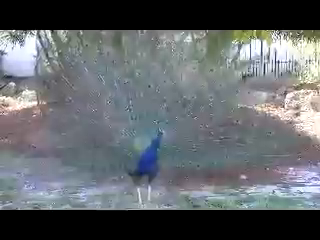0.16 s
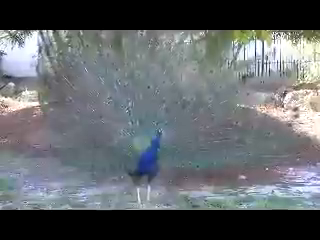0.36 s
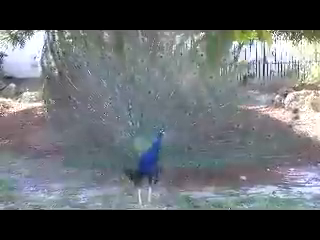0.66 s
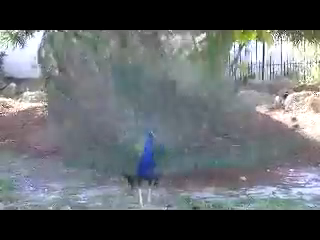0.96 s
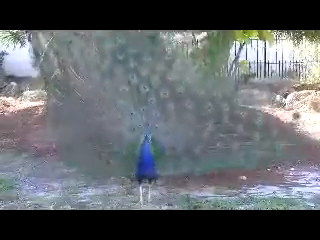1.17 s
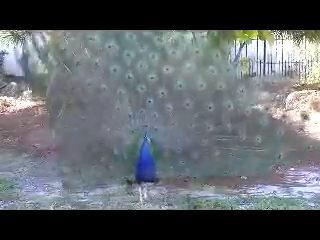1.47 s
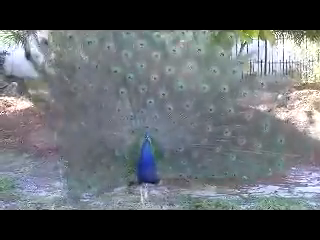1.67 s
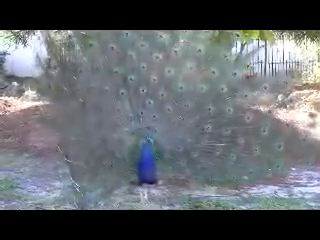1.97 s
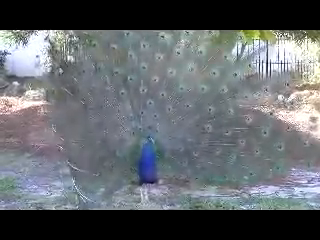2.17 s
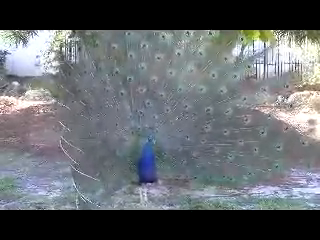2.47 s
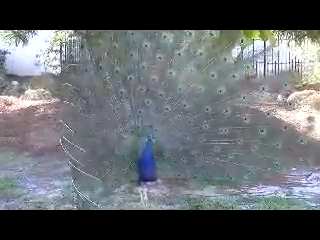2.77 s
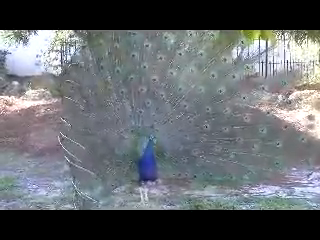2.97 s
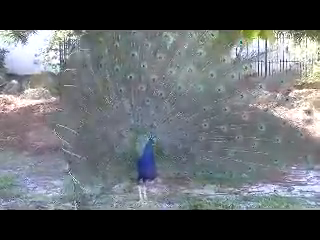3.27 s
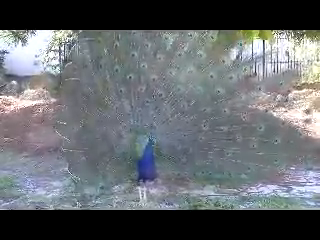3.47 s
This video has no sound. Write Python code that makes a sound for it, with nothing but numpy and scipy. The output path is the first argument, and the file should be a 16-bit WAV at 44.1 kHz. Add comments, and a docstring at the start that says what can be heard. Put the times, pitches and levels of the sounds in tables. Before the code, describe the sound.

Stiff feathers brush and click in a brief, dry, papery flurry, centred, then settle. Outdoors, soft traffic wash, faint machine hum and a thin whine continue throughout; dull treble limit, slightly wide background.

```python
"""A peacock rattling its train

A fanned train swings round: barbs rustle, bunches of feathers brush past each other, stiff quills click.
Rustle and brushes are sprays of tiny filtered grains; each click is a snap, a noisy chatter and a short ring.
Behind lie a wash of distant traffic in filtered noise, a faint machine hum and a thin high whine in sines.
Nearly everything sits in the middle; only the background wash has stereo width, which narrows for a while."""
import sys
import numpy as np
from scipy.fft import rfft, irfft, next_fast_len
from scipy.io import wavfile
from scipy.ndimage import map_coordinates

SR = 44100
rng = np.random.default_rng(int(sys.argv[2]) if len(sys.argv) > 2 else 0)


def transcribe(u):
    """Save the signal u as a 16-bit wav file named by the first command-line argument.

    u: samples, shape (n,) or (channels, n), limited to [-1, 1]; the rate is SR.
    q: integer samples, one column per channel.
    """
    v = np.clip(np.atleast_2d(u).T, -1, 1)
    q = np.round(v * 32767).astype(np.int16)
    wavfile.write(sys.argv[1], SR, q)


N = 159642  # length in samples
TIME_S = np.arange(N) / SR


def amp(db):
    """Decibels to gain."""
    return 10 ** (np.asarray(db) / 20)


def unit(x):
    """Scaled to rms 1."""
    return x / np.sqrt(np.mean(x ** 2) + 1e-20)


def along_frequency(points, hz):
    """(Hz, value) points read on a log frequency axis."""
    point_hz, values = np.transpose(points)
    return np.interp(np.log(hz + 1), np.log(point_hz + 1), values)


def along_time(points):
    """(seconds, value) points joined by straight lines."""
    return np.interp(TIME_S, *np.transpose(points))


def wobble(knots_per_s):
    """A smooth random curve through normally distributed knots."""
    knots = rng.standard_normal(N // 50)
    return map_coordinates(knots, [TIME_S * knots_per_s], mode="wrap")


def filtered(x, response):
    """x shaped by a gain that depends on frequency."""
    size = next_fast_len(N + 8192)
    gain = response(np.fft.rfftfreq(size, 1 / SR))
    return irfft(rfft(x, size) * gain, size)[..., :N]


def coloured(x, spectrum):
    """x given a spectrum, at rms 1."""
    return unit(filtered(x, lambda hz: amp(along_frequency(spectrum, hz))))


def narrow_noise(centre_hz, width_hz):
    """A narrow band of noise at rms 1, down to half amplitude at the edges of its width."""
    def band(hz):
        return 1 / (1 + (2 * (hz - centre_hz) / width_hz) ** 2)
    return unit(filtered(rng.standard_normal(N), band))


def tone(hz, waver_hz):
    """A sine of rms about 1 whose level and pitch waver; waver_hz spans about one deviation each way."""
    pitch_hz = hz + waver_hz * wobble(25.1) / 2
    level = np.sqrt(2) * amp(1.54 * wobble(9))
    return level * np.sin(2 * np.pi * np.cumsum(pitch_hz) / SR)


# Spectrum of the distant traffic. Each row: frequency in Hz, relative level in dB per Hz.
TRAFFIC_SPECTRUM = [(20, -14.5), (45, -16.5), (70, -14), (110, -5.5), (200, -2), (320, 0.5), (430, -2),
                    (510, -3), (630, -7.5), (780, -6.5), (980, -2), (1120, -9), (1250, -5.5), (1390, -1.5),
                    (1520, -7), (1650, -10), (1850, -11.5), (2120, -10.5), (2500, -19.5), (3000, -21.5),
                    (6500, -25.5), (7900, -27.5), (9000, -27), (10500, -30.5), (11500, -36.5), (12500, -71)]
# Stereo width by pitch. Each row: frequency in Hz, side against middle in dB before the curve below is added.
WASH_WIDTH = [(25, -27), (70, -44), (130, -34), (250, -13.5), (700, -12), (1400, -14), (2200, -12.5),
              (2800, -5.5), (3700, -20.5), (4200, -54), (10000, -48)]
# The stereo width of the background narrows to the middle for a while.
# Each row: time in seconds, change of the side level in dB.
WIDTH_CHANGE = [(0, 1.5), (.85, 1.5), (1.15, -4), (1.28, -6), (1.4, -47), (1.55, -13.5), (1.9, -3),
                (2.25, -2.5), (3.6, 1.5)]
TRAFFIC_DB, SWELL_DB = -40, .4


def traffic():
    """Distant traffic blurs into an even wash of noise, slightly wide in the middle range."""
    mid, side = coloured(rng.standard_normal((2, N)), TRAFFIC_SPECTRUM)
    side = filtered(side, lambda hz: amp(along_frequency(WASH_WIDTH, hz)))
    side = side * amp(along_time(WIDTH_CHANGE))
    wash = unit(np.array([mid + side, mid - side]))
    return amp(TRAFFIC_DB + SWELL_DB * wobble(3.34)) * wash


# Tones of distant machinery. Each row: frequency in Hz, level in dB against the strongest,
# pitch waver in Hz (as in tone).
HUM_TONES = [(495, -3, 4), (1227, -7, 4), (1355, -1, 8), (1401, 0, 7), (3037, -16, 6), (3272, -19, 6)]
HUM_DB = -53.5  # the strongest tone


def hum():
    """Distant machinery runs without a stop and gives faint, slightly wavering tones."""
    return amp(HUM_DB) * sum(amp(db) * tone(hz, waver_hz) for hz, db, waver_hz in HUM_TONES)


# Close tones of the thin high whine. Each row: frequency in Hz, level in dB against the strongest.
WHINE_TONES = [(7355, -9), (7477, -6), (7532, -9), (7768, 0), (7827, -3), (7887, -3), (7945, -9),
               (8118, -9), (8236, -4), (8292, -7), (8355, -6), (9398, -8)]
WHINE_DB, WHINE_WAVER_HZ = -66.5, 7.1  # level of the strongest tone; pitch waver as in tone


def whine():
    """Wavering tones close in pitch beat together as one thin whine that never stops."""
    return amp(WHINE_DB) * sum(amp(db) * tone(hz, WHINE_WAVER_HZ) for hz, db in WHINE_TONES)


GRAIN_SPREAD_DB = 2.5  # standard deviation of grain size


def grains(per_s, spectrum):
    """Countless tiny contacts of barb on barb, uneven in time and size, at rms 1."""
    sizes = np.sign(rng.standard_normal(N)) * amp(GRAIN_SPREAD_DB * rng.standard_normal(N))
    contacts = rng.random(N) < per_s / SR
    return coloured(sizes * contacts, spectrum)


# Spectra of the feathers: crisp barb treble, lower rasp, stiff quill.
# Each row: frequency in Hz, relative level in dB per Hz.
CRISP_SPECTRUM = [(2500, -40), (5000, -8.5), (6300, -5.5), (6900, 2.5), (7400, 3), (8000, 1.5), (8700, 2),
                  (9500, -3), (10800, -8.5), (12300, -15.5), (13000, -47)]
RASP_SPECTRUM = [(500, -21), (1200, -0.5), (2100, 2), (2500, -5.5), (2900, 2.5), (4100, 1), (4850, -3.5),
                 (5600, 0.5), (6500, -12), (9000, -40)]
QUILL_SPECTRUM = [(2500, -35), (4800, -20), (5600, 6), (6300, -5), (7100, 9.5), (8800, 2.5), (10500, -1.5),
                  (12300, -10), (13000, -40)]
# How hard the train is moving. Each row: time in seconds, level of the crisp rustle in dB.
TRAIN_EFFORT = [(0, -62.5), (.72, -67), (.86, -58.5), (.98, -50.5), (1.1, -48.5), (1.19, -47), (1.27, -44),
                (1.42, -44), (1.56, -45.5), (1.67, -47), (1.8, -49.5), (1.93, -51), (2.1, -52.5),
                (2.2, -57), (2.45, -60.5), (3.6, -90)]
RUSTLE_GRAINS_PER_S, TICKS_PER_S = 7700, 160
RUSTLE_RASP_DB, TICK_DB = -2.5, -13  # against the crisp treble
FLUTTER_DB, FLUTTER_KNOTS_PER_S = 1.5, 70


def rustle():
    """Barbs rub all over the train, fluttering, as hard as it moves; stray ticks stand out."""
    level_db = along_time(TRAIN_EFFORT) + FLUTTER_DB * wobble(FLUTTER_KNOTS_PER_S)
    crisp = grains(RUSTLE_GRAINS_PER_S, CRISP_SPECTRUM)
    rasp = amp(RUSTLE_RASP_DB) * grains(RUSTLE_GRAINS_PER_S, RASP_SPECTRUM)
    ticks = amp(TICK_DB) * grains(TICKS_PER_S, QUILL_SPECTRUM)
    return amp(level_db) * (crisp + rasp + ticks)


# Bunches of feathers brushing past each other. Each row: middle in seconds, spread to either side in seconds
# (standard deviation), peak level of the crisp treble in dB, rasp in dB relative to BRUSH_RASP_DB.
FEATHER_BRUSHES = [(.775, .018, -51.5, -11), (0.945, 0.0087, -48, 3.5), (1.043, 0.011, -46, 7),
                   (1.155, .014, -44.5, 4), (1.205, .004, -43.5, 6), (1.252, 0.013, -36.5, 1),
                   (1.308, 0.0044, -37.5, 4.5), (1.348, 0.0068, -38, 2), (1.404, .005, -42.5, 9.5),
                   (1.432, 0.0065, -38.5, 7), (1.495, 0.0053, -46, 8), (1.524, 0.0062, -42, 0),
                   (1.565, 0.0035, -42.5, -9), (1.61, 0.011, -40, 3), (1.71, 0.0067, -42, 6),
                   (1.855, 0.0073, -44.5, 2), (1.883, 0.01, -49.5, 6), (1.966, 0.013, -47.5, 4.5),
                   (2.054, .004, -43, 1.5), (2.069, .003, -42, -3), (2.14, 0.0062, -41.5, 2)]
BRUSH_GRAINS_PER_S, BRUSH_RASP_DB = 6000, -8  # rasp against the crisp treble


def brushes():
    """Each bunch sweeps past another: a short spray of barb contacts swells and fades."""
    crisp = grains(BRUSH_GRAINS_PER_S, CRISP_SPECTRUM)
    rasp = grains(BRUSH_GRAINS_PER_S, RASP_SPECTRUM)
    out = np.zeros(N)
    for middle_s, spread_s, db, rasp_db in FEATHER_BRUSHES:
        swell = np.exp(-.5 * ((TIME_S - middle_s) / spread_s) ** 2)
        out += amp(db) * swell * (crisp + amp(BRUSH_RASP_DB + rasp_db) * rasp)
    return out


# Quills clicking. Each row: start in seconds, level in dB (the click's energy spread over CLICK_HOLD_S),
# low rasp in dB against the chatter, centre of the ring in Hz.
QUILL_CLICKS = [(1.2149, -29.5, -10, 6950), (1.2397, -41, -10, 7500), (1.2437, -31, -6, 8750),
                (1.252, -27, -5.5, 7400), (1.2595, -42, -16, 9000), (1.2856, -38, -11, 7440),
                (1.303, -40, 10, 5500), (1.337, -31, -6, 8400), (1.346, -28, -4, 7400),
                (1.3576, -32, -4, 8600), (1.404, -35, -7, 8400), (1.4354, -31.5, -1, 7400),
                (1.6077, -33, -10, 7000), (1.6151, -27, -7, 7200), (1.8024, -31, -14, 8450),
                (2.113, -30.5, -8, 7360)]
CLICK_HOLD_S, CLICK_T60_S = 0.0021, 0.0088  # a quill slips, chatters and stops
SNAP_DB, SNAP_T60_S = -3, 0.0034  # the first contact, added on top of the held chatter
RING_DB, RING_WIDTH_HZ = -1.5, 900  # a short narrow ring coloured by the microphone, against the chatter


def clicks():
    """A quill slips off its neighbour: a snap, then a dry chatter with a brief high ring."""
    out = np.zeros(N)
    chatter = coloured(rng.standard_normal(N), QUILL_SPECTRUM)
    rasp = coloured(rng.standard_normal(N), RASP_SPECTRUM)
    for start_s, db, rasp_db, ring_hz in QUILL_CLICKS:
        age = TIME_S - start_s
        snap = amp(SNAP_DB - 60 * np.abs(age) / SNAP_T60_S)
        hold_and_fade = amp(-60 * np.maximum(age - CLICK_HOLD_S, 0) / CLICK_T60_S)
        envelope = (age >= 0) * (snap + hold_and_fade)
        ring = amp(RING_DB) * narrow_noise(ring_hz, RING_WIDTH_HZ)
        click = envelope * (chatter + amp(rasp_db) * rasp + ring)
        # equal energy for every click before its level
        out += amp(db) * click * np.sqrt(CLICK_HOLD_S * SR / np.sum(click ** 2))
    return out


def scene():
    """The bird in the middle, over the traffic and machinery."""
    background = traffic() + hum() + whine()
    return background + rustle() + brushes() + clicks()


def record(dry):
    """A sharp band limit: nothing passes from 13 kHz up."""
    return filtered(dry, lambda hz: hz < 13000)


dry = scene()
out = record(dry)
transcribe(out)
```